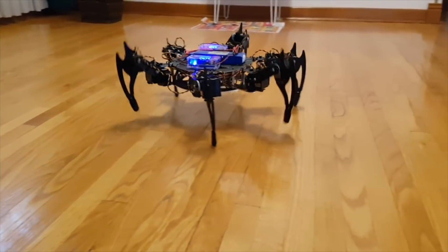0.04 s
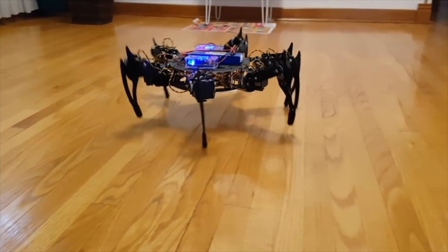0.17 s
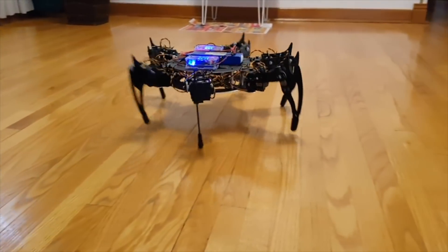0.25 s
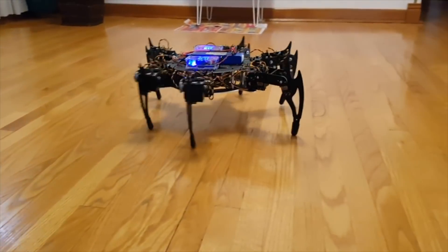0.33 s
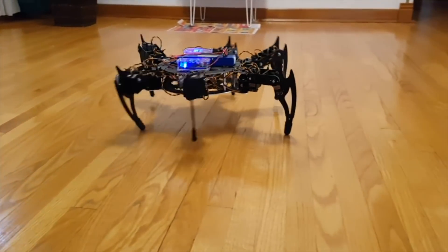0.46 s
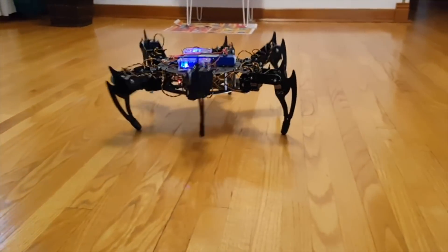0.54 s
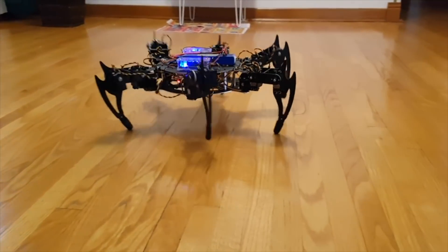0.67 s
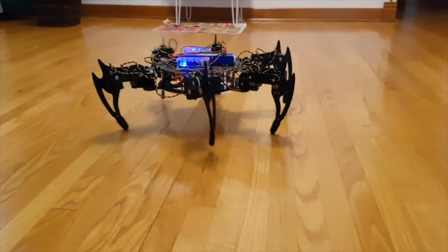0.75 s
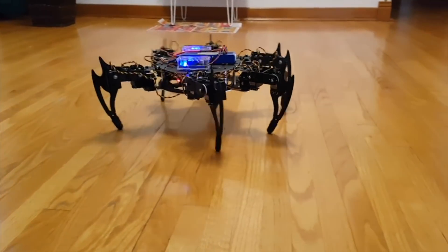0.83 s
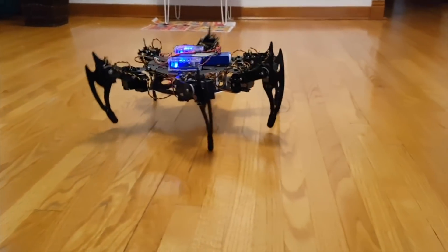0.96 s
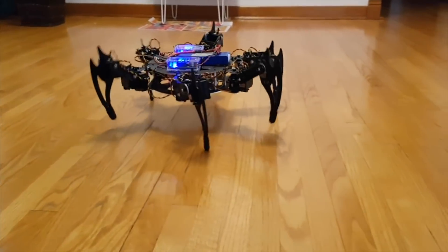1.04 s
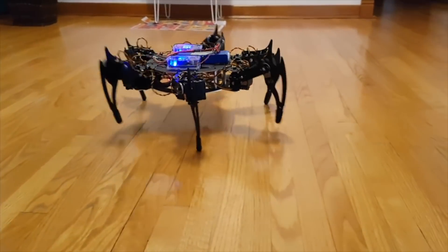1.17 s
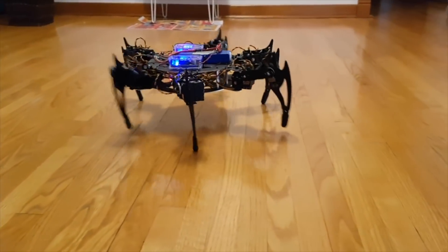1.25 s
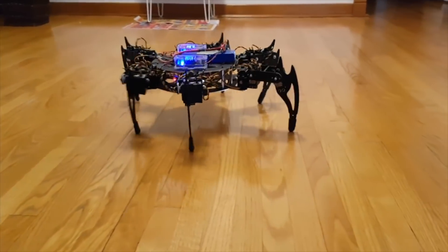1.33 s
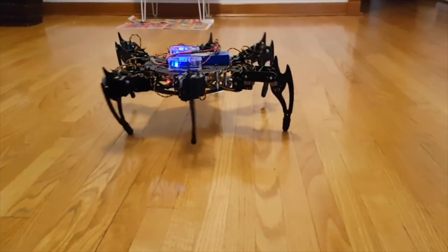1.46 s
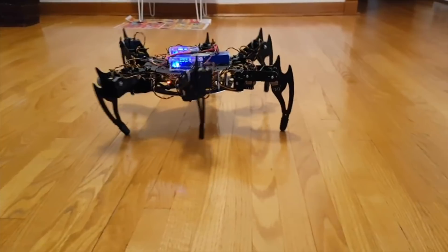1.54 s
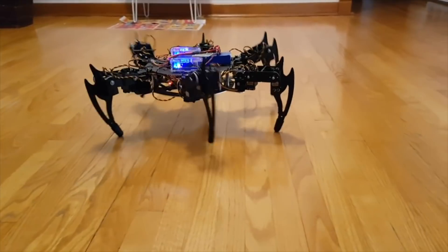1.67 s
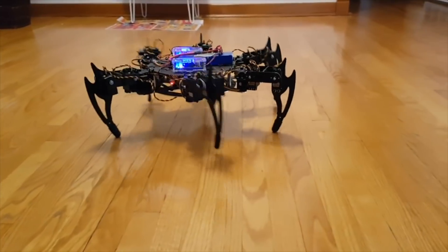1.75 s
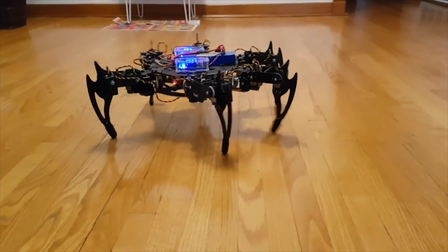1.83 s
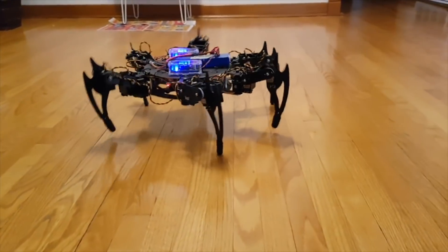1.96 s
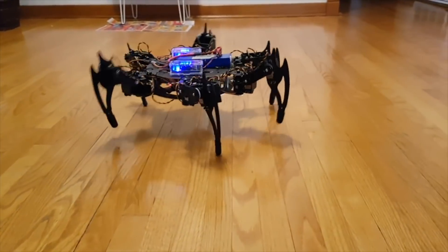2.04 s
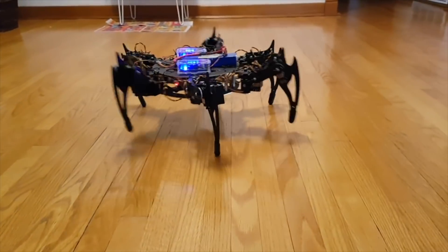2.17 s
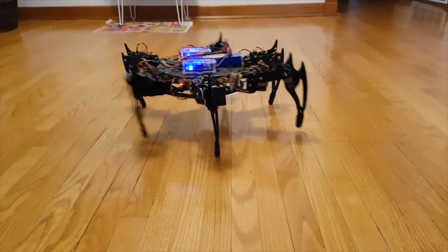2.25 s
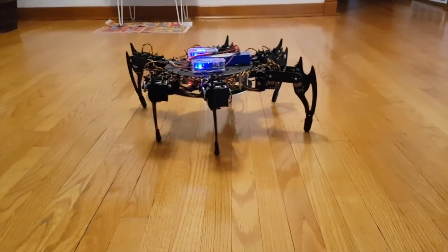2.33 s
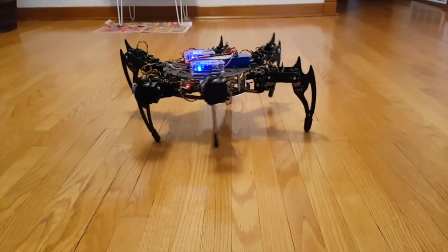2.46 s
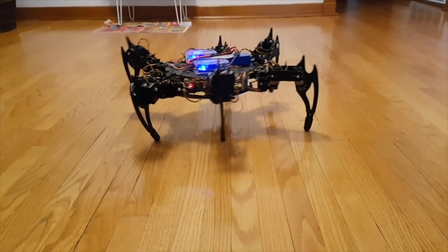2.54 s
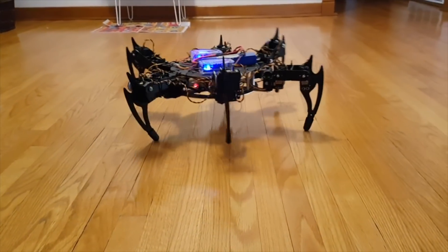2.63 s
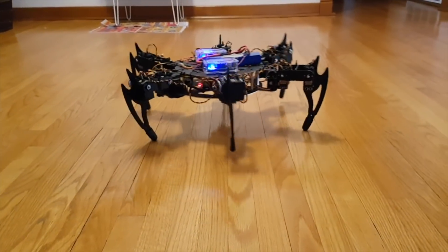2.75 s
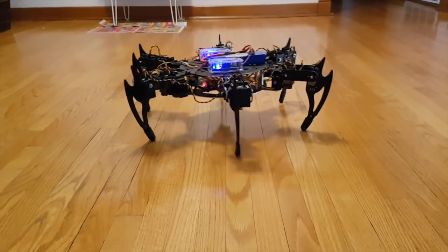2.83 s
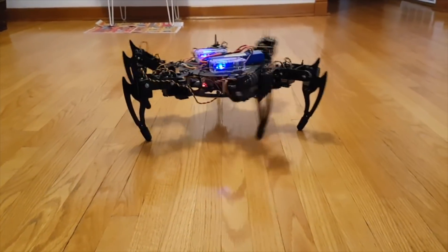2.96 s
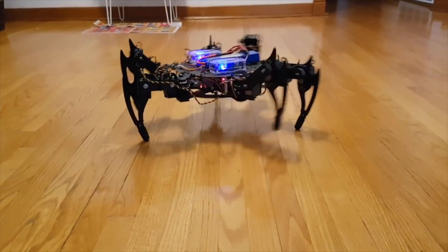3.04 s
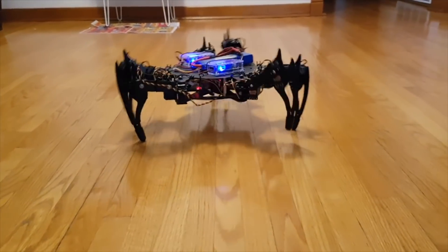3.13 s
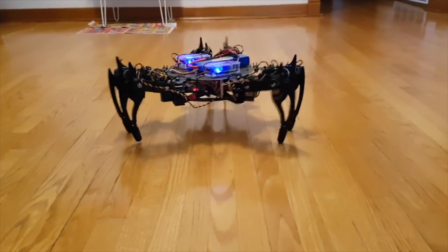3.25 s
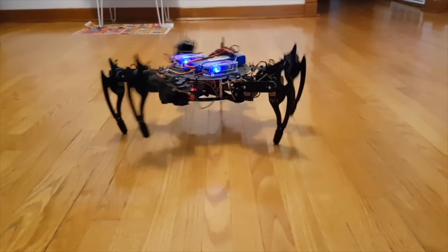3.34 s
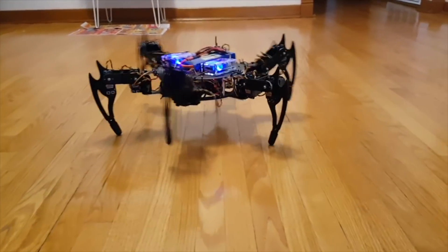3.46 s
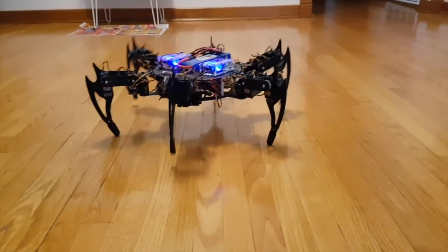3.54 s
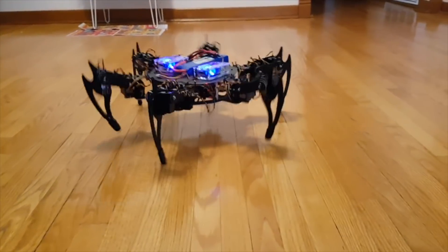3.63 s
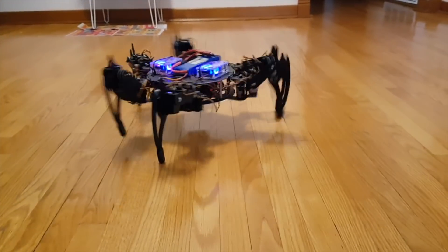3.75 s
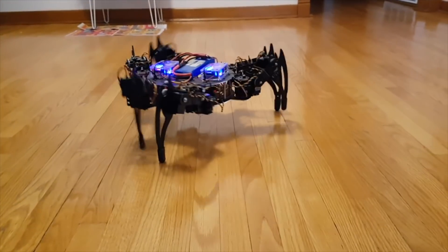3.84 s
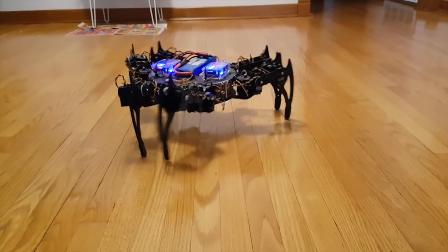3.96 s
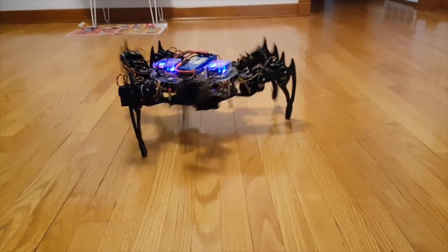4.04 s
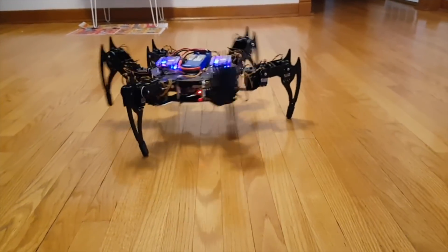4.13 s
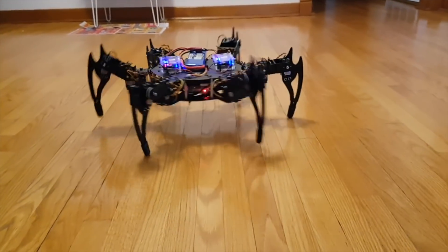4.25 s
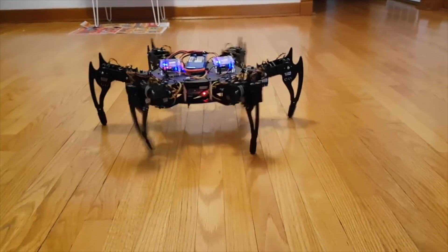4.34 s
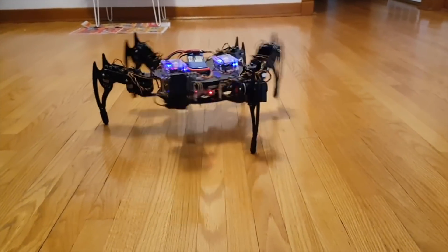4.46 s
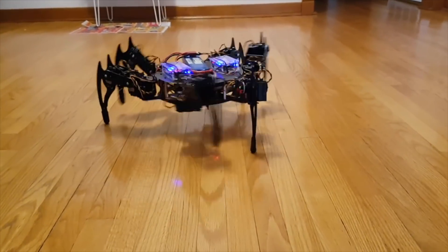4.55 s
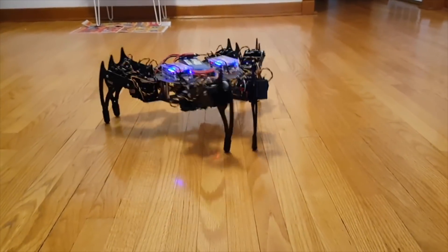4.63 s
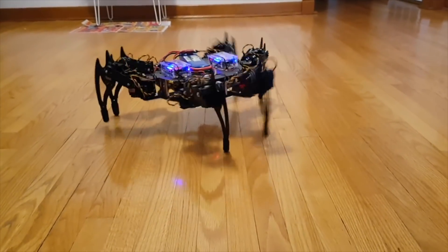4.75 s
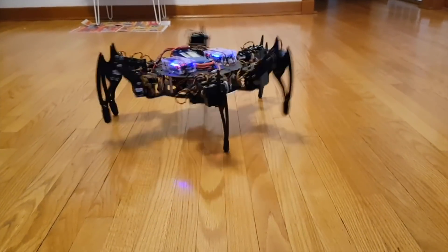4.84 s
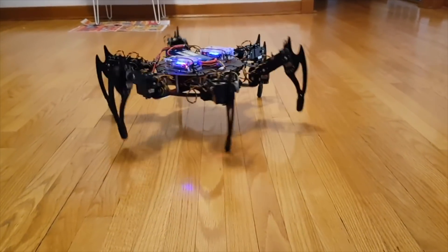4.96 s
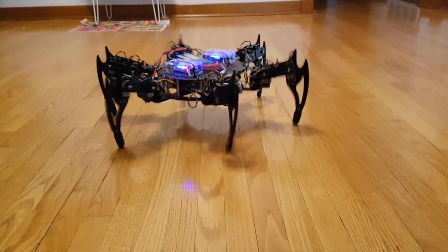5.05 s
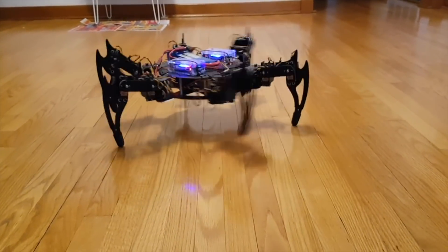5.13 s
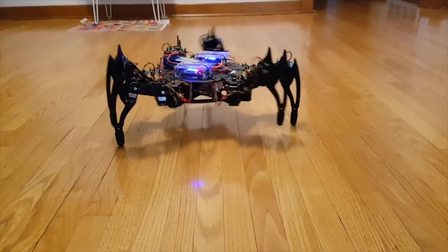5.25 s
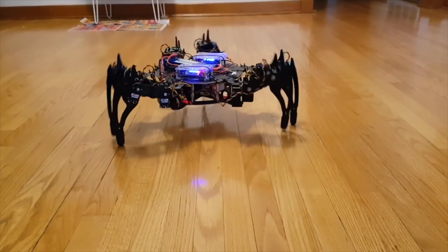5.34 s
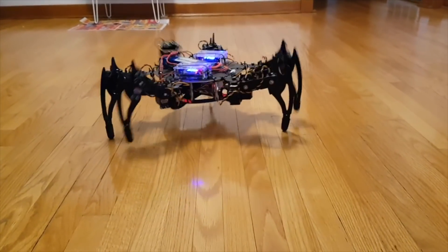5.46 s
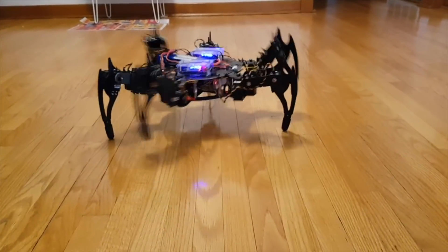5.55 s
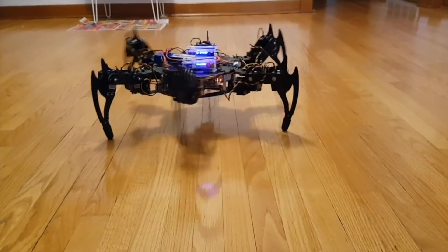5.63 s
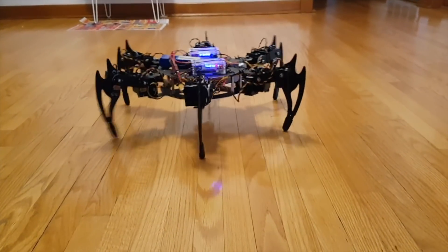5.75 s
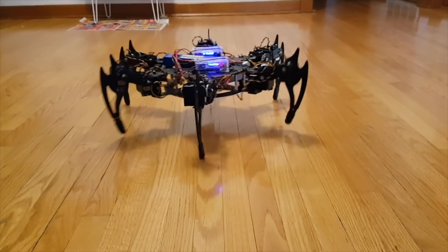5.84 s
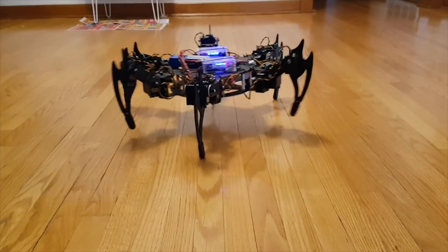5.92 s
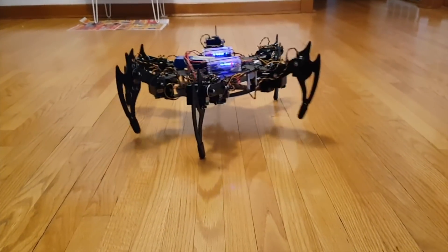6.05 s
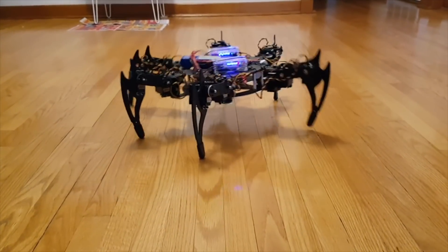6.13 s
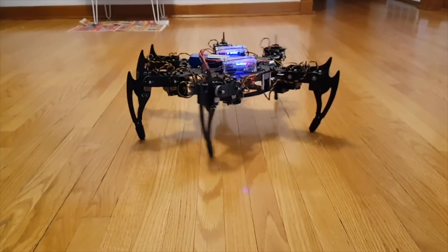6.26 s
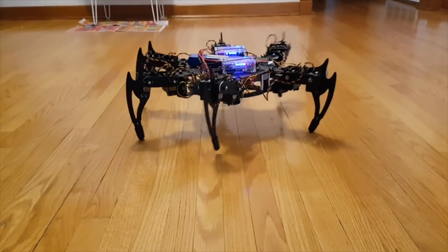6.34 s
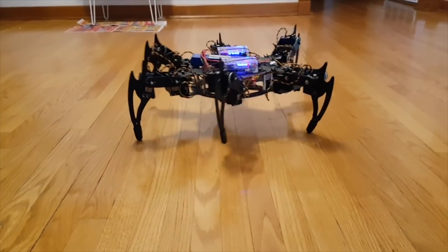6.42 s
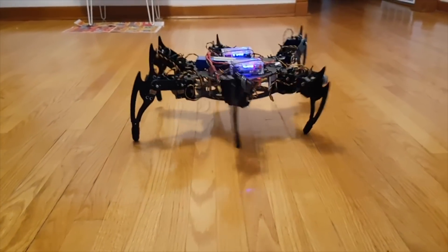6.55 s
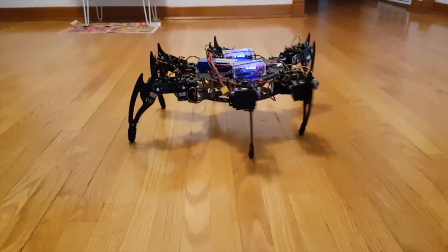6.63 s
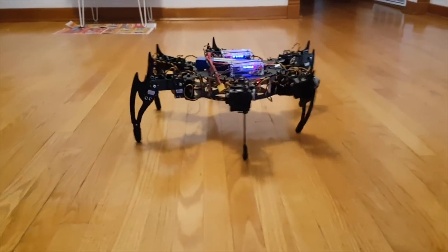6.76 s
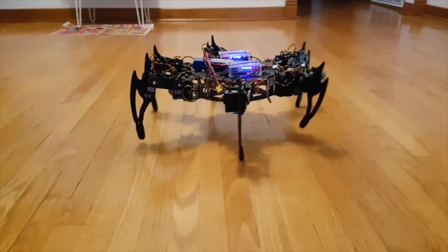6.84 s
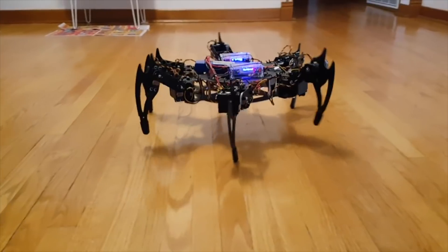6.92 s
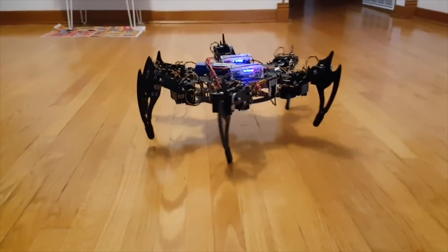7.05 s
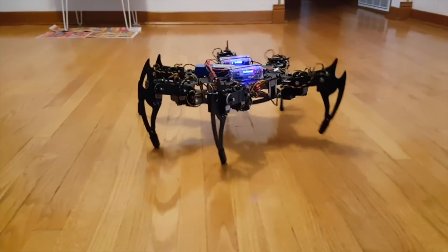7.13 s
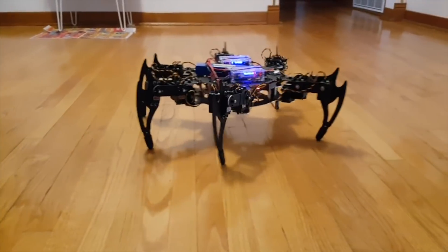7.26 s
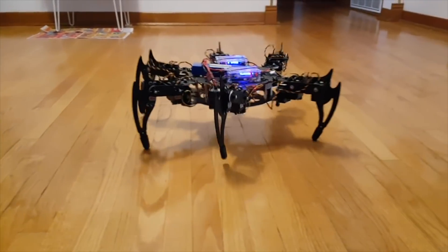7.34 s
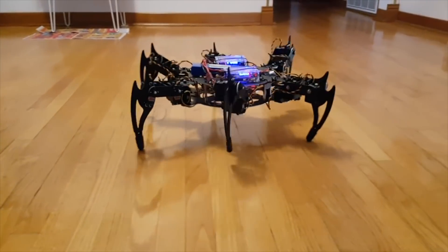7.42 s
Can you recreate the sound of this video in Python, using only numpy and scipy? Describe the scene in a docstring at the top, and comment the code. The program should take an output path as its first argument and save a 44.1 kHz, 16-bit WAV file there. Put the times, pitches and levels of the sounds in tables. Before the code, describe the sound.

A small six-legged robot walks on a wooden floor in a living room, heard from close by. Its servo gears whirr throughout, a high, hissy sound with a slight growl that swells with each leg stroke, three to four times a second. From about 0.4 to 3 seconds the plastic feet land softly every half second, two or three almost together, each landing a low thud with a light knock and tick. From 3.3 to 6 seconds the steps are louder and less even, the boards clatter, and the gears sing out in short, high whines. Sharp leg-tip clacks stand out near 3.7, 4.4, 5.1 and 5.5 seconds, the strongest at 4.4. From 6 seconds the motors ease, with moderate steps near 6.2, 6.7 and 7.2 seconds. The steps have a short room reverberation, and a faint low house rumble continues underneath.

```python
"""A six-legged robot walks on a wooden living-room floor, three feet landing nearly together.
Each impact excites damped modes: the floor thuds, the boards knock and clatter, the plastic leg ticks,
and on hard landings its tip clacks. Gear teeth drive the resonances of the servo cases, which whirr
stroke by stroke and sing out under load. The steps reverberate; the house rumbles faintly below."""
import sys
import numpy as np
from scipy import signal
from scipy.fft import rfft, irfft, next_fast_len
from scipy.io import wavfile

SR = 44100
rng = np.random.default_rng(int(sys.argv[2]) if len(sys.argv) > 2 else 0)


def generate_wav(sig):
    """Save sig (samples, or channels by samples) to the path in sys.argv[1] as 16-bit PCM at SR."""
    pcm = np.round(np.clip(np.atleast_2d(sig).T, -1, 1) * 32767).astype(np.int16)
    wavfile.write(sys.argv[1], SR, pcm)


N = 330309


def from_db(db):
    """Amplitude ratio of a level in decibels."""
    return 10 ** (np.asarray(db) / 20)


def unit_rms(x):
    """Normalisation to unit mean power."""
    return x / np.sqrt(np.mean(x ** 2) + 1e-20)


def at_hz(curve, hz):
    """Interpolation on a logarithmic frequency axis."""
    frequency_hz, values = np.transpose(curve)
    return np.interp(np.log(hz), np.log(frequency_hz), values)


def drift(rate_hz):
    """Random modulation: low-passed noise of unit power."""
    hop, settle = 40, 2000
    pole = np.exp(-2 * np.pi * rate_hz * hop / SR)
    noise = rng.standard_normal(N // hop + settle + 2)
    slow = signal.lfilter([1], [1, -2 * pole, pole * pole], noise)[settle:]
    return np.interp(np.arange(N) / hop, np.arange(len(slow)), unit_rms(slow))


def resonance(x, hz, width_hz):
    """Forced response of a two-pole resonator with unit peak gain."""
    radius = np.exp(-np.pi * width_hz / SR)
    feedback = [1, -2 * radius * np.cos(2 * np.pi * hz / SR), radius ** 2]
    return signal.lfilter((1 - radius ** 2) / 2 * np.array([1, 0, -1]), feedback, x)


def damped_modes(hz, t60_s, swell_s):
    """Damped vibration: each mode, one to a row, swells as the bending wave fills it, then decays."""
    t = np.arange(SR // 2) / SR
    hz, t60_s = np.reshape(hz, (-1, 1)), np.reshape(t60_s, (-1, 1))
    return (1 - np.exp(-t / swell_s)) * from_db(-60 * t / t60_s) * np.sin(2 * np.pi * hz * t)


# Likeness of left and right: frequency_hz, coherence
COHERENCE = [(60, 1), (180, 0.89), (550, 0.63), (1650, 0.2), (4970, 0.066), (15000, 0.033)]
# Balance of the two sides: frequency_hz, left_over_right_db
BALANCE = [(60, -2), (150, -1), (380, -1), (950, -0.5), (2380, -1.5), (5980, -8), (15000, 2)]
def stereo(mid, side, hz):
    """Partial coherence: a shared and an opposed part sum to left and right, most alike in the bass."""
    coherence, polarity = at_hz(COHERENCE, hz), np.array([[1], [-1]])
    pair = np.sqrt((1 + coherence) / 2) * mid + np.sqrt((1 - coherence) / 2) * side * polarity
    return from_db(at_hz(BALANCE, hz) / 2 * polarity) * pair


# Noise spectrum of the house: frequency_hz, relative_density_db
HOUSE_SPECTRUM = [(18, -47), (30, -3), (55, -5), (118, 2.5), (190, -10.5), (310, -18.5), (780, -20),
                  (1500, -19.5), (2600, -21.5), (6000, -42)]
def house_rumble(level_db, waver_db):
    """Ambient noise: rumble and air in half-octave bands, each wavering independently."""
    out, edges_hz = 0, 20 * 2 ** np.arange(0, 8.6, .5)
    white = rng.standard_normal((2, 2, N))
    for k, (low, high) in enumerate(zip(edges_hz, edges_hz[1:])):
        band = signal.butter(2, [low, high], "band", fs=SR, output="sos")
        mid, side = signal.sosfilt(band, white[k % 2])
        hz = np.sqrt(low * high)
        out += from_db(at_hz(HOUSE_SPECTRUM, hz) + waver_db * drift(5.2)) * stereo(mid, side, hz)
    return from_db(level_db) * unit_rms(out)


def room_reverb(x, t60_s, half_t60_hz):
    """Reverberation: ten feedback delays a side, duller on every round as the walls absorb treble."""
    size = next_fast_len(N + SR)
    hz = np.arange(size // 2 + 1) * SR / size
    decay_s = t60_s / (1 + hz / half_t60_hz)
    response = np.zeros((2, len(hz)), complex)
    for k, delay_s in enumerate(np.geomspace(.011, .043, 20)):
        loop = from_db(-60 * delay_s / decay_s) * np.exp(-2j * np.pi * hz * delay_s)
        response[k % 2] += loop / (1 - loop) * (-1) ** (k // 2)
    shared = at_hz(COHERENCE, hz + 1)   # long waves reach both sides alike
    response = shared * response.mean(axis=0) * np.sqrt(2) + (1 - shared) * response
    return irfft(rfft(x.mean(axis=0), size) * response, size)[:, :N]


# Moments when a narrow band of noise sings out: above 4 kHz a loaded gear train, below 2 kHz a leg scuffing the
# varnish: start_s, length_s, level_db, pitch_hz
NARROW_SURGES = [(.1, .25, -66, 1360), (.4, .11, -60, 1340), (.45, .095, -47, 5300), (.46, .09, -63, 1700),
                 (1.088, .075, -47, 4800), (1.38, .15, -64, 1370), (1.56, .1, -51, 4020),
                 (1.88, .12, -63, 1330), (1.9, .1, -60, 1790), (2.42, .1, -57, 1310), (3.06, .11, -42, 5600),
                 (3.332, .135, -40, 5150), (3.751, .115, -40, 5460), (3.995, .092, -41, 5510),
                 (4.416, .2, -42, 4820), (4.43, .15, -41, 5460), (5.113, .14, -42, 5000),
                 (5.133, .07, -45, 4450), (5.147, .19, -42, 5350), (5.465, .15, -41, 5250),
                 (5.833, .082, -43, 4390), (6.112, .16, -48, 6000), (6.18, .065, -45, 4520),
                 (6.955, .09, -46, 4570), (7.189, .08, -51, 6000), (7.229, .065, -50, 5200)]
def narrow_surges(relative_width):
    """Narrow-band noise: a hiss at the given pitch swells and fades in a half sine."""
    out, span = np.zeros((2, N + SR)), SR // 2
    for start_s, length_s, level_db, hz in NARROW_SURGES:
        noise, width_hz = rng.standard_normal((2, span)), relative_width * hz
        mid, side = resonance(resonance(noise, hz, width_hz), hz, width_hz)
        swell = np.sin(np.pi * np.clip(np.arange(span) / SR / length_s, 0, 1))
        start = int(start_s * SR)
        out[:, start:start + span] += from_db(level_db) * swell * unit_rms(stereo(mid, side, hz))
    return out[:, :N]


def gear_mesh(cases, teeth_per_s, uneven_db, waver_db, whine_hz=0, whine_db=0):
    """Shot noise: teeth meet at random and ring the servo cases, boosted near any whine pitch."""
    force = from_db(uneven_db * np.minimum(rng.exponential(1, (2, N)), 5))
    polarity = rng.choice([-1, 1], (2, N))
    impacts = force * polarity * (rng.random((2, N)) < teeth_per_s / SR)
    out = 0
    for k, (hz, width_hz, level_db) in enumerate(cases):
        own_impacts = np.roll(impacts, 30011 * k, axis=1)   # every case has its own gears
        mid, side = resonance(resonance(own_impacts, hz, width_hz), hz, width_hz)
        swell_db = waver_db * (drift(3.34) + drift(32))
        boost_db = whine_db * np.exp(-((hz - whine_hz) / 400) ** 2)
        out += from_db(level_db + swell_db + boost_db) * stereo(mid, side, hz)
    return unit_rms(out)


def stroke_power(level_db, rise_db):
    """Incoherent powers add: overlapping strokes spin up and down over motors holding their pose."""
    spin_up_s, spin_down_s, overlap_s, holding_db = 0.074, 0.076, 0.031, -10
    t = np.arange(N) / SR
    power = from_db(np.interp(t, np.array(SERVO_STROKES)[:, 0], level_db) + holding_db) ** 2
    for (start_s, length_s, *_), db, rise in zip(SERVO_STROKES, level_db, rise_db):
        age_s = t - start_s
        spin_up = (age_s + overlap_s) / spin_up_s
        spin_down = (length_s + overlap_s - age_s) / spin_down_s
        speed = np.clip(np.minimum(spin_up, spin_down), 0, 1)
        ramp_db = rise * np.clip(age_s / length_s - .5, -.5, .5)
        power += (speed * from_db(db + ramp_db)) ** 2
    return power


# Low, middle and high resonances of the servo cases: centre_hz, width_hz, relative_db
GROWL_CASES = [(1367, 260, -9.5), (1900, 3140, -9), (2287, 210, -9.5), (3106, 780, -2), (3780, 750, 1)]
WHIRR_CASES = [(4266, 320, 0.5), (4540, 550, 2), (4945, 600, -0.5), (5344, 560, -1.5), (5720, 680, -1.5),
               (6054, 1020, 0.5), (7140, 4100, -6)]
BRIGHT_CASES = [(8990, 1420, -2.5), (9680, 1850, -5.5), (11930, 4100, -7.5), (12650, 830, -10.5),
                (15100, 980, -42)]
# Strokes, from one reversal of the legs to the next: start_s, length_s, whirr_db, bright_db, growl_db,
# whirr_rise_db, bright_rise_db, whine_from_hz, whine_to_hz
SERVO_STROKES = [(0, 0.18, -44, -47.5, -51, -4, -14, 5230, 4900),
                 (0.208, 0.21, -43, -44.5, -51, 10, 8.6, 5300, 5350.0),
                 (0.416, 0.3, -44, -46.5, -53, 5, -2, 5190.0, 5330),
                 (0.722, 0.21, -43.5, -42.5, -48.5, 0.4, -2, 5300, 5130.0),
                 (0.957, 0.24, -44.5, -47, -51.5, 0, -4, 4980.0, 4890.0),
                 (1.188, 0.24, -44.5, -43.5, -51, 7, 5, 5290.0, 5270.0),
                 (1.439, 0.28, -44, -46, -52.5, 0.5, -4, 5030.0, 5170),
                 (1.724, 0.22, -43.5, -44, -50, -1.5, -4, 5600, 5330),
                 (1.964, 0.21, -44, -46.5, -51, 2, -3.0, 5300, 4950),
                 (2.197, 0.22, -44.5, -42.5, -51.5, 8, 7, 5670, 5530),
                 (2.427, 0.28, -43, -46.5, -49.5, -1, -6, 5400, 5040),
                 (2.7, 0.22, -44, -46.5, -52.5, 4, 5.8, 5200.0, 5130),
                 (2.98, 0.31, -39.5, -39.5, -47.5, -4.5, -4, 4900, 5340.0),
                 (3.273, 0.35, -39, -40.5, -48.5, 3, 6, 5330, 5360),
                 (3.635, 0.31, -41, -40.5, -45.5, 0.5, 1, 4900, 5100),
                 (3.952, 0.37, -39.5, -43, -48.5, 3, 2, 5300, 5290.0),
                 (4.333, 0.37, -40.5, -40.5, -47, 1.5, 4.5, 5230, 5030),
                 (4.695, 0.41, -38.5, -41, -49.5, -6, -2, 5000, 5670),
                 (5.111, 0.33, -42.5, -42, -46.0, -11, -7, 5200, 5340.0),
                 (5.424, 0.39, -39, -41, -47.5, -2, 8, 5230, 5460),
                 (5.787, 0.28, -45.5, -47, -50.5, -5, -9, 5200, 4970),
                 (6.09, 0.21, -44.5, -46, -56.5, -3, 5, 5670.0, 5700),
                 (6.373, 0.2, -42, -46.5, -50, 4, 1, 5430.0, 5290.0),
                 (6.58, 0.22, -44, -46.5, -49, 12.1, 4, 5230.0, 5200),
                 (6.824, 0.25, -46, -44.5, -50, 9, 0, 4800, 4600),
                 (7.083, 0.21, -44.5, -45, -51.5, 11, 4, 5100, 5480.0),
                 (7.332, 0.25, -42.5, -46, -50, 9, 7.6, 5200, 5300.0)]
def servos(strain_whirr_db, strain_growl_db, strain_t60_s):
    """Amplitude modulation: gear noise follows the leg strokes and the load of each landing."""
    (start_s, length_s, whirr_db, bright_db, growl_db,
     rise_db, bright_rise_db, from_hz, to_hz) = np.transpose(SERVO_STROKES)
    glide_s = np.ravel([start_s + length_s / 5, start_s + length_s * 4 / 5], "F")
    whine_hz = np.interp(np.arange(N) / SR, glide_s, np.ravel([from_hz, to_hz], "F"))
    thud_db = np.array(FOOTFALLS)[:, 1]
    load_power = landing_decay(2 * thud_db, strain_t60_s / 2)   # squared amplitude falls twice as fast
    whirr = gear_mesh(WHIRR_CASES, 6000, uneven_db=0.5, waver_db=2, whine_hz=whine_hz, whine_db=5.5)
    bright = gear_mesh(BRIGHT_CASES, 4900, uneven_db=2, waver_db=1.78)
    growl = gear_mesh(GROWL_CASES, 4000, uneven_db=1.5, waver_db=1.2)
    whirr_power = stroke_power(whirr_db, rise_db) + load_power * from_db(strain_whirr_db) ** 2
    bright_power = stroke_power(bright_db, bright_rise_db)
    growl_power = stroke_power(growl_db, rise_db / 2) + load_power * from_db(strain_growl_db) ** 2
    return np.sqrt(whirr_power) * whirr + np.sqrt(bright_power) * bright + np.sqrt(growl_power) * growl


# Hard landings of a bare leg tip on the varnish: start_s, level_db, pitch_hz
TIP_CLACKS = [(3.33, -27, 2290), (3.6925, -15, 3600), (4.428, -9.5, 2300), (5.1322, -18, 1520),
              (5.1462, -19, 2040), (5.4625, -19, 2150), (6.736, -22, 400), (6.7375, -31, 3220),
              (7.2409, -27, 1820)]
def tip_clacks(t60_s, overtone_ratio, overtone_db):
    """Impulse response of the leg tip: two heavily damped modes struck at once."""
    out = np.zeros((2, N + SR))
    for start_s, level_db, hz in TIP_CLACKS:
        low, high = damped_modes([hz, hz * overtone_ratio], [t60_s, t60_s / 2], swell_s=0.00025)
        clack = from_db(level_db) * (low - from_db(overtone_db) * high)
        start = int(start_s * SR)
        out[:, start:start + len(clack)] += stereo(clack, 0, hz)
    return out[:, :N]


def landing_decay(level_db, t60_s):
    """Exponential decay: an envelope that jumps at every landing and dies away."""
    impulses = np.full(N, 1e-18)
    impulses[(np.array(FOOTFALLS)[:, 0] * SR).astype(int)] = from_db(level_db)
    return signal.lfilter([1], [1, -from_db(-60 / (t60_s * SR))], impulses)


def at_landings(sounds):
    """Superposition of one stereo sound for each landing."""
    out = np.zeros((2, N + SR))
    for (start_s, *_), sound in zip(FOOTFALLS, sounds):
        start = int(start_s * SR)
        out[:, start:start + sound.shape[1]] += sound
    return out[:, :N]


def rattle(peaks, blow_db, crack_t60_s, rattle_t60_s, rattle_db):
    """Two-stage decay of resonant noise: a short crack, then loose parts rattle."""
    knee_db, slope = -22, 0.9   # blows below the knee lose their crack faster than their rattle
    crack_db = blow_db + slope * np.minimum(blow_db - knee_db, 0)
    envelope = landing_decay(crack_db, crack_t60_s) + landing_decay(blow_db + rattle_db, rattle_t60_s)
    mid_side = envelope * rng.standard_normal((2, N)) * [[1], [.8]]
    return sum(from_db(level_db) * stereo(*resonance(mid_side, hz, width_hz), hz) * (-1) ** k
               for k, (hz, width_hz, level_db) in enumerate(peaks))


# Resonances of a plastic leg: centre_hz, width_hz, gain_db
LEG_RESONANCES = [(1417, 720, 4), (2050, 1470, 5), (2830, 1330, 3), (3560, 930, -7), (4800, 910, -7.5)]
def leg_ticks(tick_db, delay_s):
    """Propagation delay: a leg's scuff on the varnish comes by air, just after the thud in the floor."""
    ticks = rattle(LEG_RESONANCES, tick_db, crack_t60_s=0.024, rattle_t60_s=0.18, rattle_db=-1.5)
    return np.roll(ticks, int(delay_s * SR), axis=1)


def struck_wood(modes, blow_db, swell_s, spot_hz=600, db_per_octave=0):
    """Modal excitation: a foot strikes all modes in random polarity; any roll-off centres on its spot."""
    hz, level_db, t60_s = np.transpose(modes)
    polarity, scatter, spread = rng.standard_normal((len(FOOTFALLS), 3, len(modes))).swapaxes(0, 1)
    octaves_away = np.abs(np.log2(hz / np.reshape(spot_hz, (-1, 1))))
    mode_db = blow_db[:, None] + level_db - db_per_octave * octaves_away + 2 * scatter
    mids = np.sign(polarity) * from_db(mode_db)
    sides = 0.82 * mids * spread
    rings = damped_modes(hz, t60_s, swell_s)
    return at_landings(stereo(mid, side, hz) @ rings for mid, side in zip(mids, sides))


def floor_thud(blow_db, spot_hz, t60_s, swell_s):
    """Plate vibration: the span under the foot dips first, then rings at its natural frequency."""
    rings = -from_db(blow_db)[:, None] * damped_modes(spot_hz, t60_s, swell_s)
    return at_landings(stereo(ring, 0, hz) for ring, hz in zip(rings, spot_hz))


# Modes of the floor on its joists, and of the boards: pitch_hz, gain_db, t60_s
JOIST_MODES = [(66, -5.5, 0.49), (95.4, -4.5, 0.36), (115.2, -4.5, 0.4), (140.7, -2, 0.23),
               (162, 3.5, 0.13), (182.8, 7, 0.065), (202.5, -1.5, 0.15), (237.7, 5, 0.12),
               (273, 4.5, 0.046), (288.2, 3, 0.095), (367.4, -5, 0.32)]
BOARD_MODES = [(466, 7.5, 0.027), (490.8, -2, 0.18), (535, -0.5, 0.1), (595, -1.5, 0.11), (687, -8.5, 0.17),
               (784, -7, 0.049), (923, -0.5, 0.018), (954, 0, 0.086), (1039, -12, 0.14)]
# Resonances of loose boards: centre_hz, width_hz, gain_db
LOOSE_BOARDS = [(326, 28, 2), (474, 410, -2), (880, 900, -4), (1390, 1260, -8)]
# Feet landing on the floor: start_s, thud_db, knock_re_thud_db, tick_re_thud_db, spot_pitch_hz
FOOTFALLS = [(0.386, -27, -13.5, -13, 148), (0.409, -31, -8, -16, 115), (0.438, -38, -14, 0.5, 111),
             (0.886, -29.5, -14, -12, 146), (0.943, -34, -11, -4, 135), (1.412, -31, -14, -11, 149),
             (1.446, -34.5, -16, -19, 203), (1.884, -28.5, -17, -12, 140), (1.925, -32, -12, -4.5, 159),
             (2.397, -30, -13.5, -9, 153), (2.413, -27.5, -15.5, -12, 135), (2.867, -25, -23, -30, 137.5),
             (2.924, -28, -23, -26, 142), (2.985, -38, -15, -13, 111), (3.298, -23, -14.5, -15, 156),
             (3.328, -30, 0, -7.5, 224), (3.349, -16.5, -13, -31, 188.5), (3.688, -19, -11.5, -3.5, 180),
             (3.694, -25.5, 1, -13, 103), (3.704, -13, -27, -29, 161), (3.733, -25, -9, -10, 162),
             (4.012, -27, -13, -9.5, 145), (4.056, -24, -16, -27, 189), (4.4164, -21.5, -12, -8, 258),
             (4.427, -16, -6, 1.5, 214), (4.447, -18.5, -14, -14, 129), (4.461, -22, -3.5, -9, 176),
             (4.705, -20, -25, -17, 169), (4.749, -36, -5, -22, 182), (5.131, -20.5, -1.5, -8, 162),
             (5.147, -23, 1, -10, 299), (5.156, -12.5, -22, -16, 185.4), (5.459, -30, -6, 0.5, 205),
             (5.479, -21, -14.5, -15, 167), (5.528, -28, -15, -29, 183), (5.848, -18, -20, -12.5, 171),
             (5.868, -17.5, -11.5, -21, 147.4), (5.911, -36, -9, -10, 137), (6.204, -26, -11.5, -9.5, 150),
             (6.224, -20.5, -11, -18, 209.4), (6.24, -22, -25, -25, 181), (6.283, -30, -6, -6.5, 186.4),
             (6.736, -28, -3.5, -6, 165), (6.761, -30.5, -15, -21, 128), (6.805, -24.5, -20, -27, 160),
             (7.238, -26.5, -9, -7, 122), (7.25, -26, -14, -11, 139.5), (7.289, -26.5, -38, -19, 121),
             (7.323, -27, -35, -20, 171.6)]
def footsteps():
    """Impact sound: each foot sets the floor, joists, boards and its own leg vibrating."""
    _, thud_db, knock_re_thud_db, tick_re_thud_db, spot_hz = np.transpose(FOOTFALLS)
    knock_db = thud_db + knock_re_thud_db
    thud = floor_thud(thud_db, spot_hz, t60_s=.14, swell_s=0.0043)
    joists = struck_wood(JOIST_MODES, thud_db - 6, swell_s=0.0071, spot_hz=spot_hz, db_per_octave=9)
    knock = struck_wood(BOARD_MODES, knock_db - 6, swell_s=.0015)
    clatter = rattle(LOOSE_BOARDS, knock_db + 7.5, crack_t60_s=0.018, rattle_t60_s=0.5, rattle_db=-4.5)
    return thud + joists + knock + clatter + leg_ticks(thud_db + tick_re_thud_db, delay_s=.0025)


def scene():
    """Superposition of the steps, their reverberation, the servos and the house."""
    steps = footsteps() + tip_clacks(t60_s=.009, overtone_ratio=1.5, overtone_db=-4)
    reverb = from_db(-18.5) * room_reverb(steps, t60_s=0.34, half_t60_hz=22000)
    gears = servos(strain_whirr_db=-25, strain_growl_db=-30.5, strain_t60_s=0.7)
    surges = narrow_surges(relative_width=0.055)
    return steps + reverb + gears + surges + house_rumble(level_db=-51, waver_db=0.97)


def record(dry):
    """Low-pass filtering: a steep cut removes the highest treble."""
    stopband_db, stopband_hz = 60, 15900
    return signal.sosfilt(signal.cheby2(24, stopband_db, stopband_hz, fs=SR, output="sos"), dry)


dry = scene()
out = record(dry)
generate_wav(out)
```